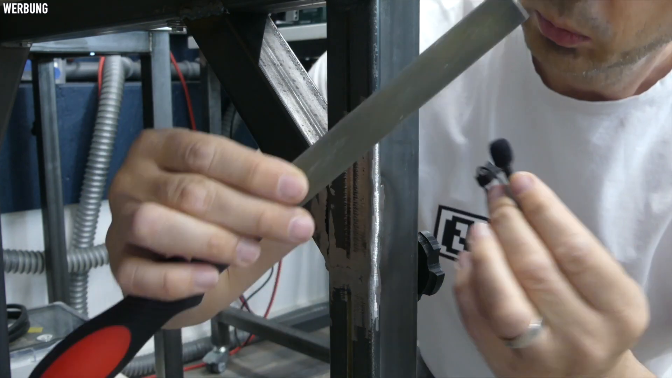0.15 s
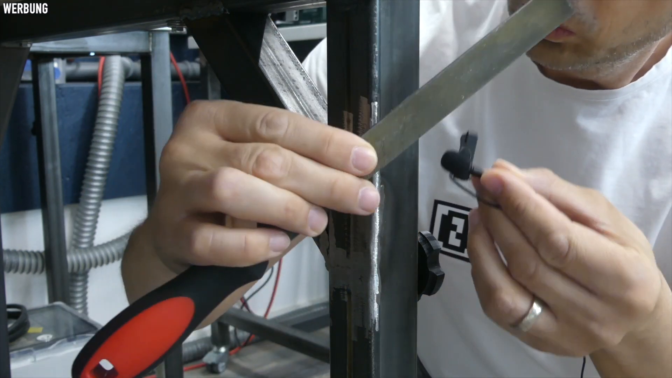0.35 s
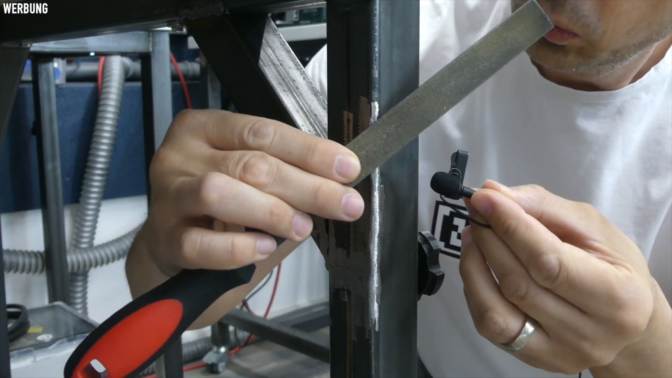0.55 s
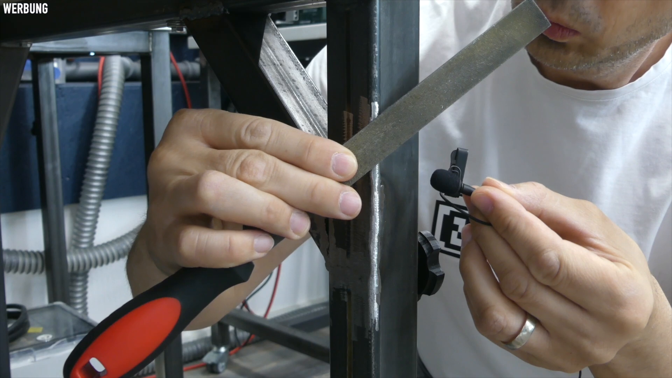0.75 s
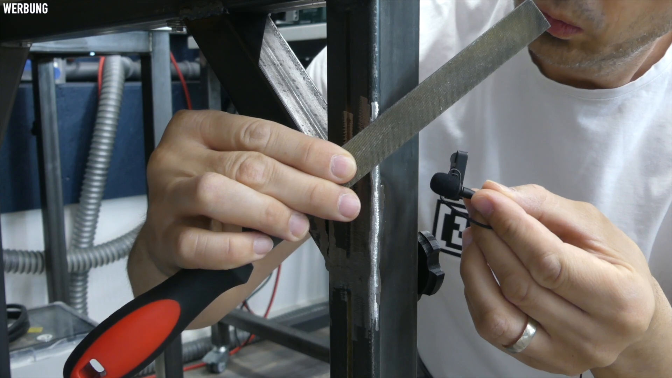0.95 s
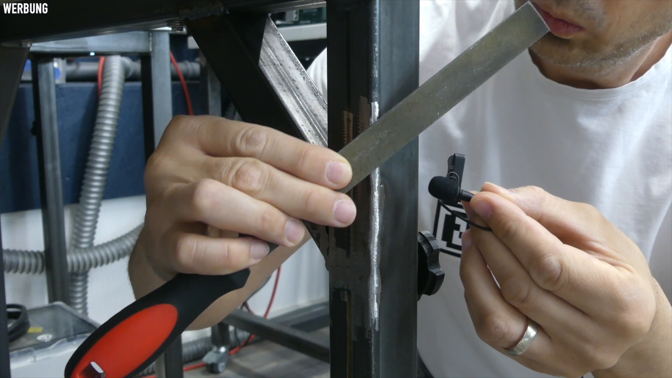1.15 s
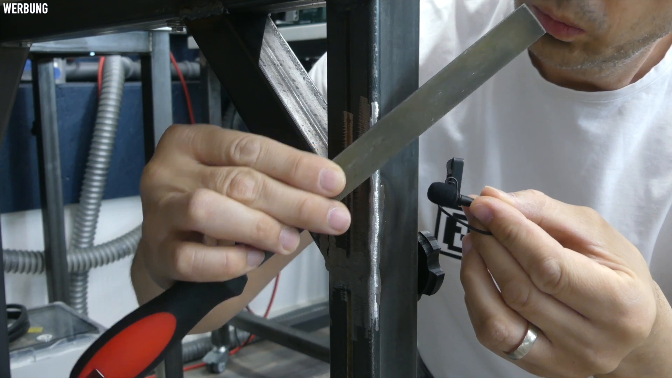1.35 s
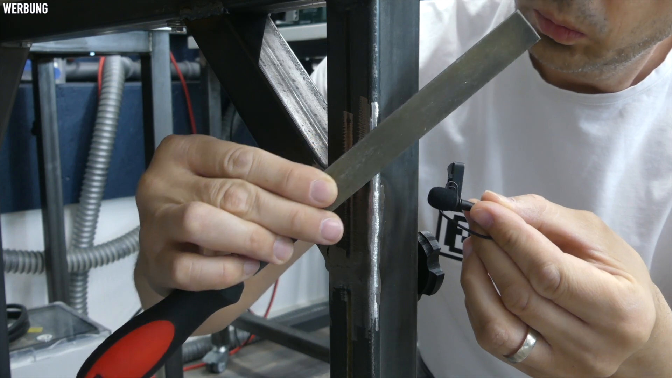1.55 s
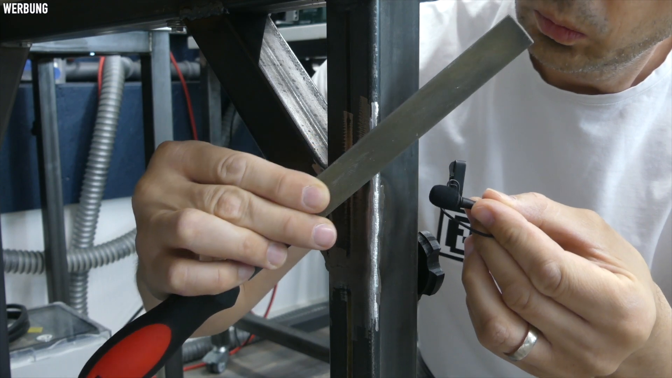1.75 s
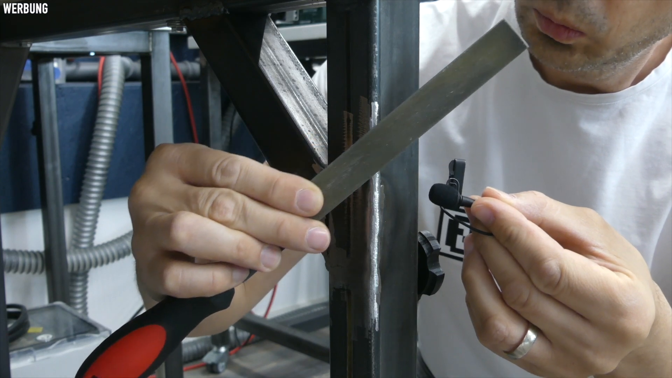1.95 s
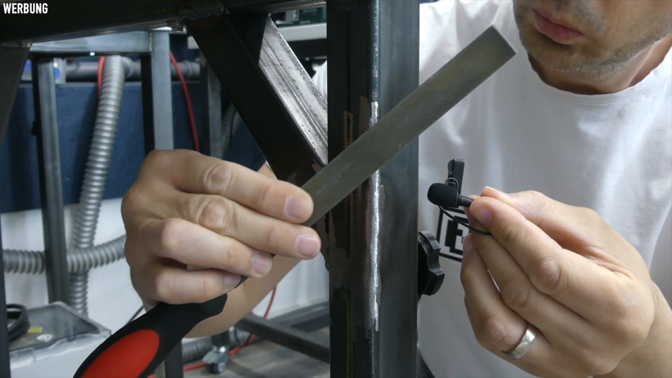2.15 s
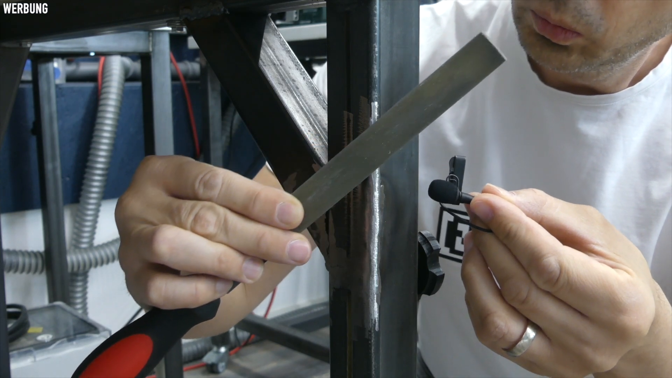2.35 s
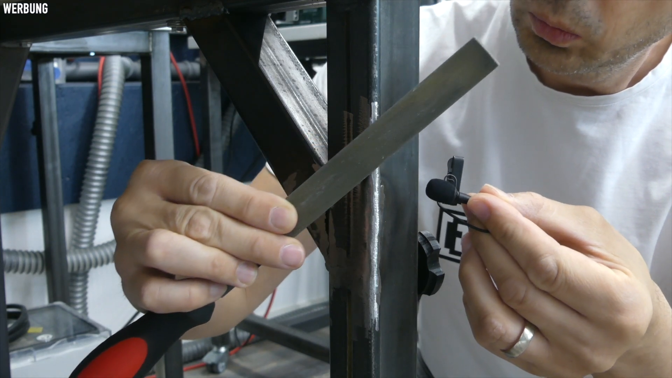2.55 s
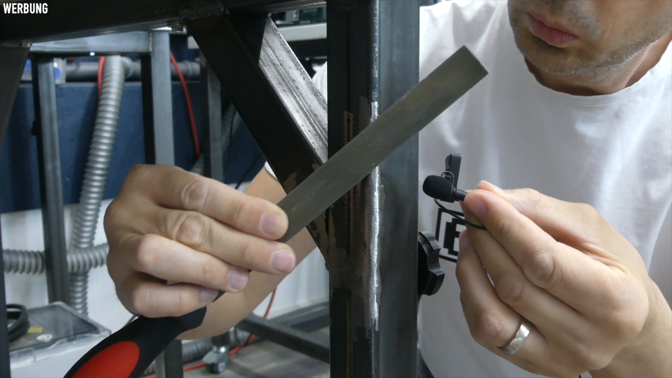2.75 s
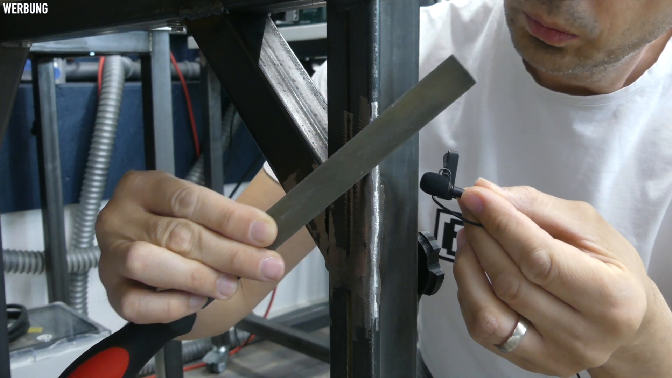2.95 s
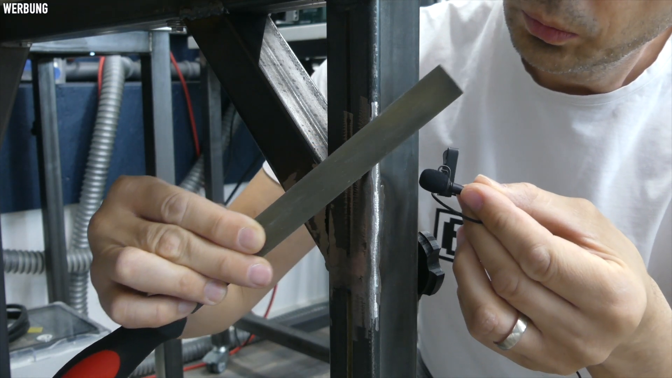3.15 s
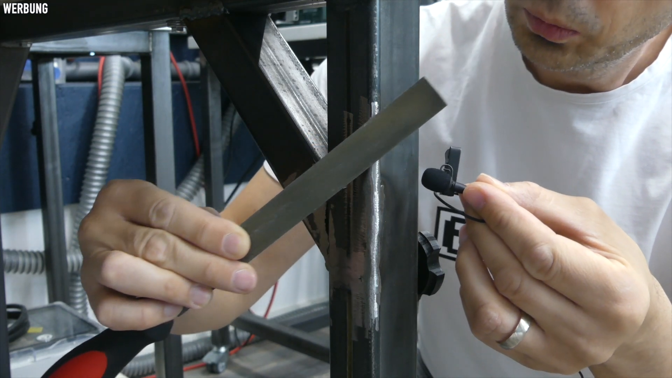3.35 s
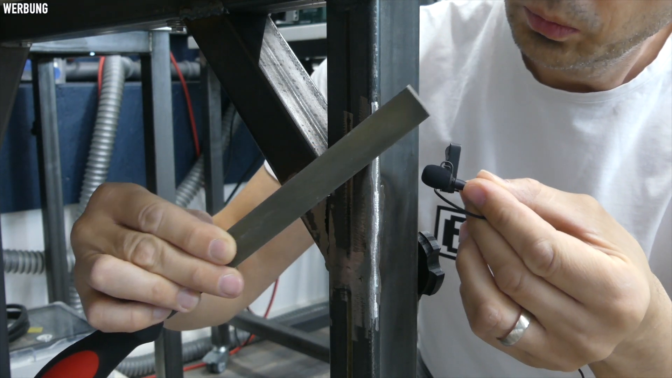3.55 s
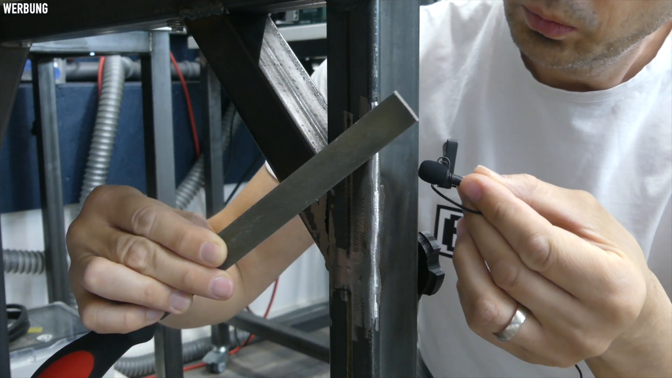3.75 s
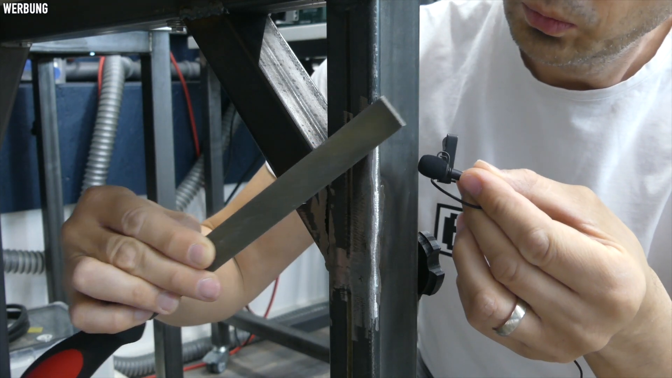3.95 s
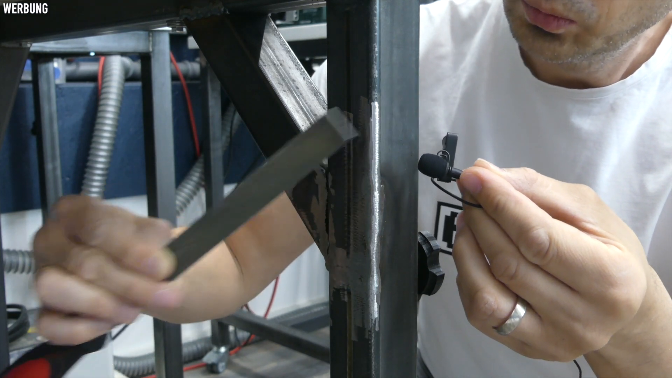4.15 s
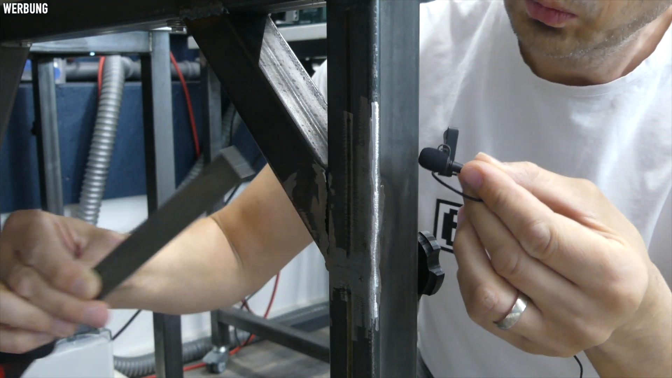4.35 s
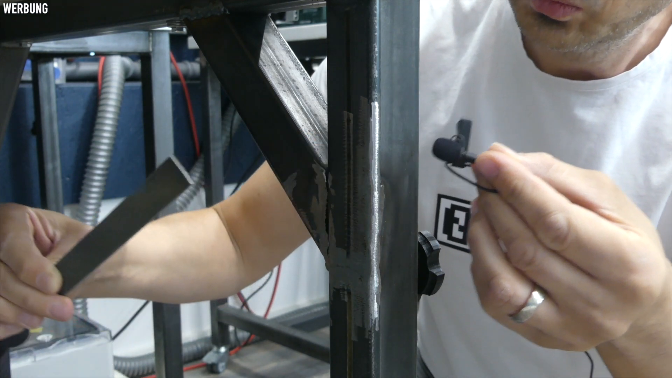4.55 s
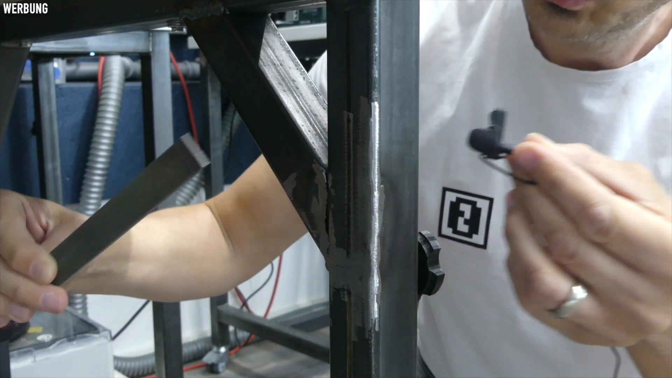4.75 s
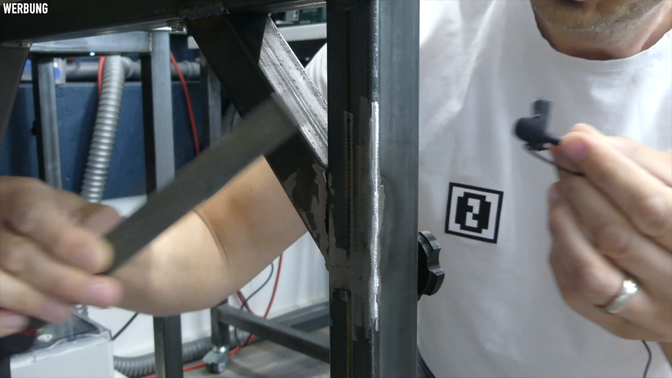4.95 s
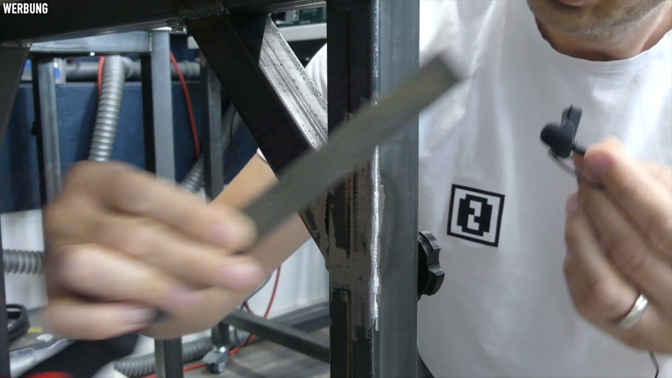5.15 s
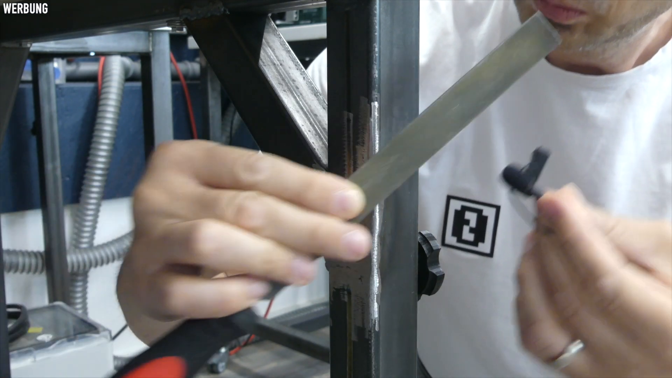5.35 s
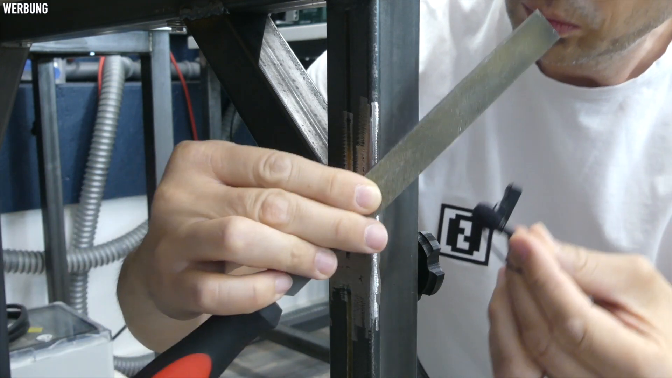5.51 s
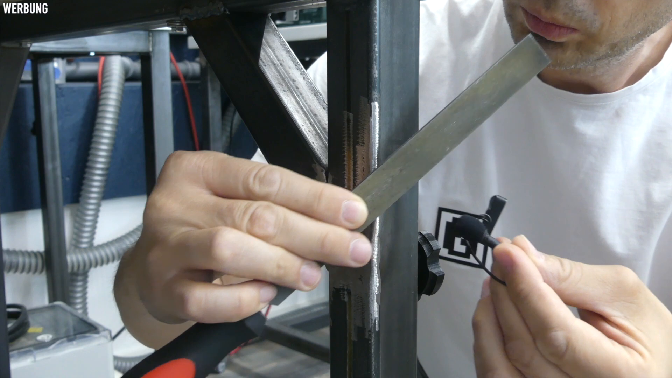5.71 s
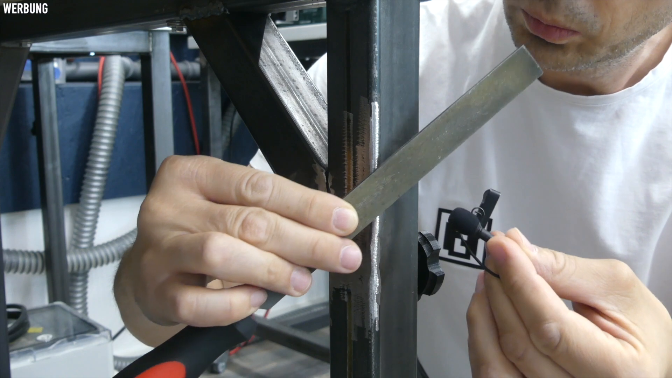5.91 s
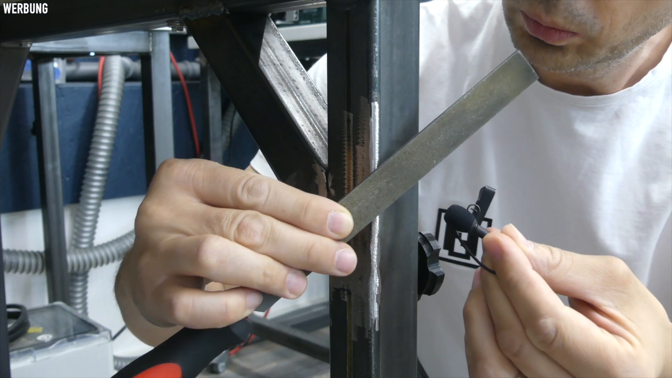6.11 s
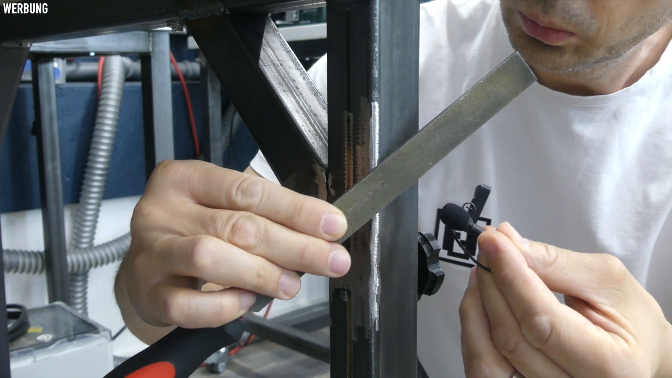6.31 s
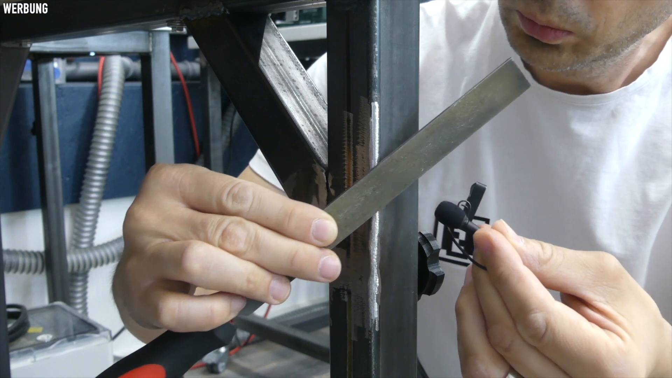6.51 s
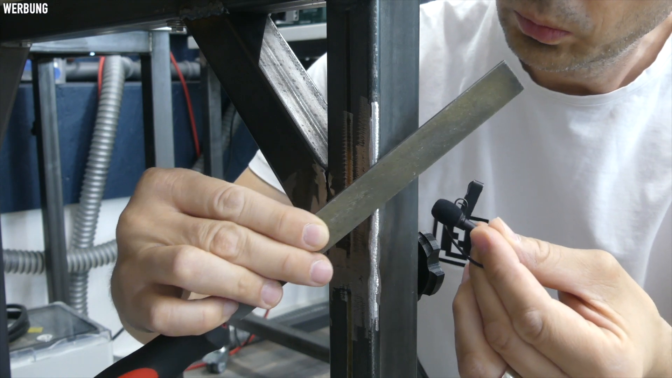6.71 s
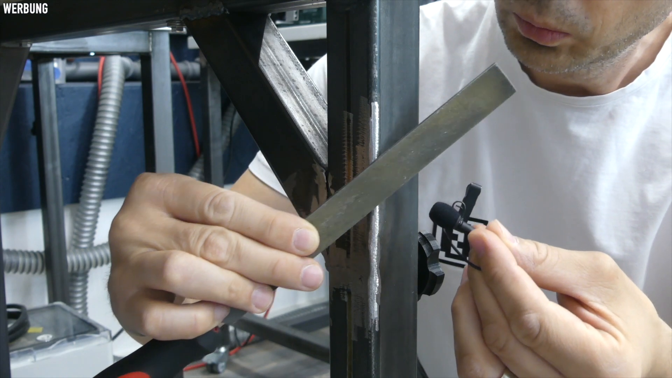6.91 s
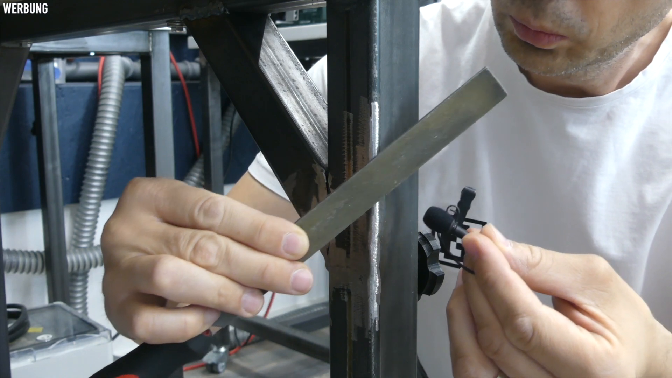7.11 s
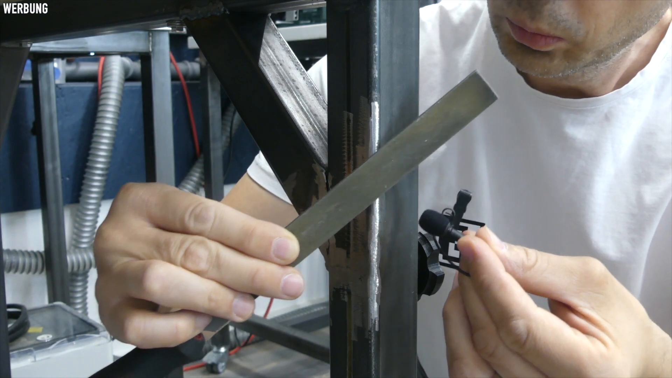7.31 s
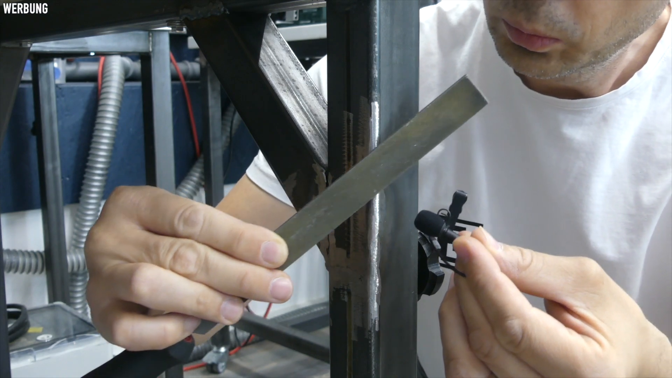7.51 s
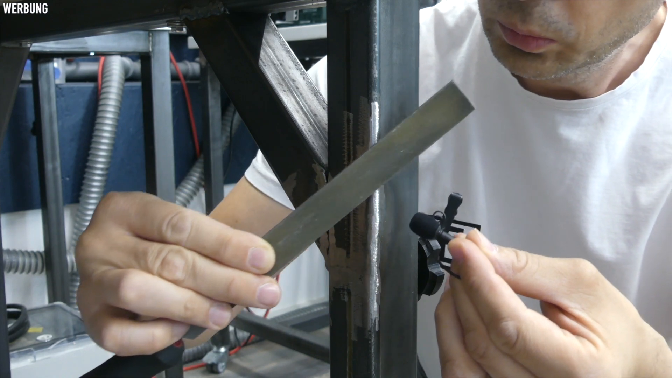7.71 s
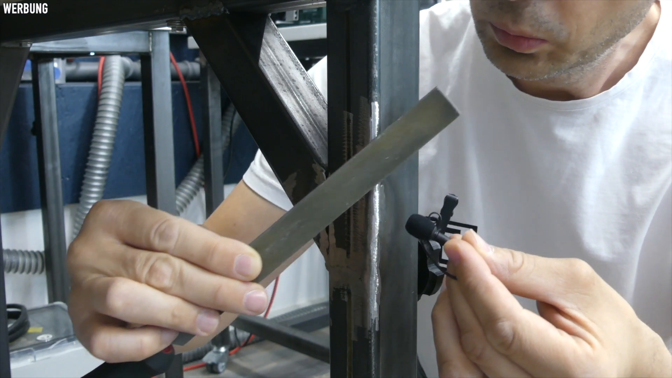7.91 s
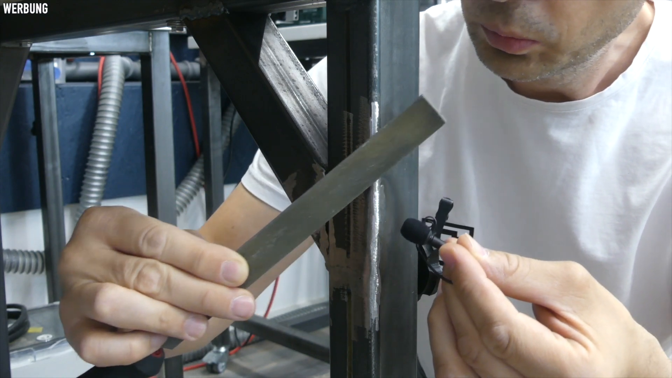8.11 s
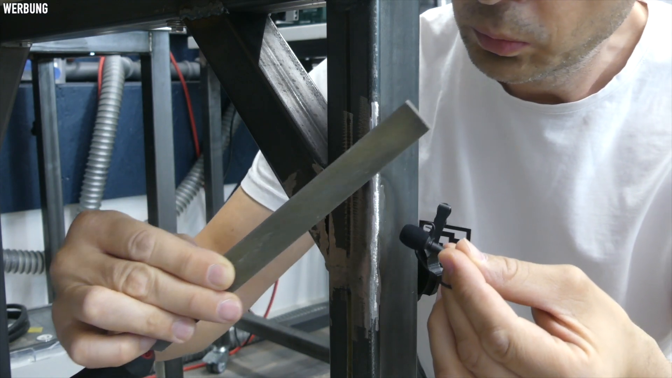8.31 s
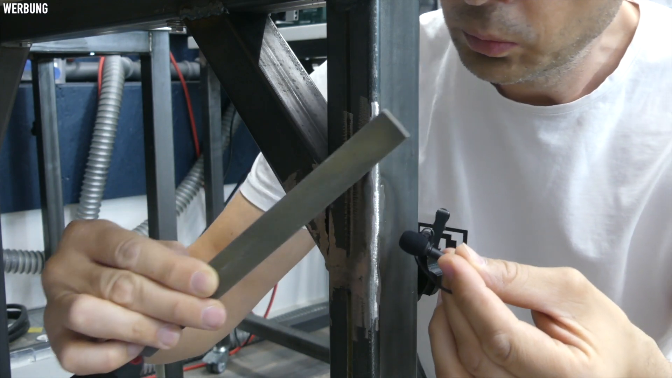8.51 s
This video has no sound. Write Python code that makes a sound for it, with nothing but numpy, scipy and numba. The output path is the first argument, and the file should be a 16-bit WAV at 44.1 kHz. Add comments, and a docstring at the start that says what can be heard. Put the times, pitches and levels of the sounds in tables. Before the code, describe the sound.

Two slow, rasping strokes of a hand file over ringing steel tube, heard very close, with ticks, cracks, a knock and brief squeals.

```python
"""A flat hand file is drawn slowly, twice, from handle to tip over the corner of a welded steel tube frame.
Its teeth catch and snap free; the tube rings at fixed pitches while the blade's own resonance climbs
towards the tip. Splinters tick, snags crack, the blade knocks the tube and short squeals sing out.
A clip-on microphone a few centimetres away also picks up fingers on it and its lead, and behind them
a quiet workshop: filtered noise for air and hiss, over a faint tone near 26 Hz.
"""
import sys
import numpy as np
from scipy import signal
from scipy.fft import rfft, irfft, next_fast_len
from scipy.io import wavfile
from scipy.ndimage import uniform_filter1d
from numba import njit

SR = 44100
rng = np.random.default_rng(int(sys.argv[2]) if len(sys.argv) > 2 else 0)


def generate_wav(sig):
    """Save sig (samples, or channels by samples) to the path in sys.argv[1] as 16-bit PCM at SR."""
    pcm = np.round(np.clip(np.atleast_2d(sig).T, -1, 1) * 32767).astype(np.int16)
    wavfile.write(sys.argv[1], SR, pcm)


N = 382523  # samples in the scene


def undb(db):
    """Decibels to gain."""
    return 10 ** (np.asarray(db) / 20)


def curve(rows):
    """The columns of a table, joined by straight lines in time."""
    seconds, *columns = np.transpose(rows)
    return [np.interp(np.arange(N) / SR, seconds, column) for column in columns]


def unit(x):
    """Scale to rms 1."""
    return x / np.sqrt(np.mean(x ** 2))


def walk(rate):
    """Random levels, `rate` new ones a second, joined by straight lines; rms 1."""
    steps = np.arange(N) / SR * rate
    return unit(np.interp(steps, np.arange(4096), rng.standard_normal(4096)))


def colour(x, points):
    """Causal minimum-phase filter with the gain of (Hz, dB) points."""
    size = next_fast_len(len(x) + 4096) // 2 * 2
    hz, db = np.transpose(points)
    bins_hz = np.arange(size // 2 + 1) * SR / size
    log_gain = np.log(undb(np.interp(np.log(bins_hz + 1), np.log(hz), db)))
    # folding the cepstrum forward in time makes the filter causal
    cepstrum = irfft(log_gain)[:size // 2]
    cepstrum[1:] *= 2
    return irfft(rfft(x, size) * np.exp(rfft(cepstrum, size)))[:len(x)]


def band(x, lo_hz, hi_hz):
    """Band-pass run twice, so that neighbouring bands add up flat."""
    sos = signal.butter(2, [lo_hz, min(hi_hz, .48 * SR)], "band", fs=SR, output="sos")
    return signal.sosfilt(sos, signal.sosfilt(sos, x))


@njit
def moving_bandpass(x, hz, width_hz):
    """State-variable band-pass, gain 1 at a centre that may move."""
    y, band_state, low_state = np.empty(len(x)), 0., 0.
    for i in range(len(x)):
        g, k = np.tan(np.pi * hz[i] / SR), width_hz[i] / hz[i]
        v = (band_state + g * (x[i] + 1e-18 - low_state)) / (1 + g * (g + k))
        band_state = 2 * v - band_state
        low_state = low_state + 2 * g * v
        y[i] = k * v
    return y


def resonate(x, hz, width_hz):
    """One resonance, fixed or moving."""
    return moving_bandpass(x, hz * np.ones(len(x)), width_hz * np.ones(len(x)))


def ring(force, response):
    """What a body with this response makes of a force."""
    return signal.oaconvolve(force, response)[:N]


def add(out, start_s, x):
    """Mix x into out from start_s."""
    i = max(int(start_s * SR), 0)
    out[i:i + len(x)] += x[:N - i]


# How the close microphone hears the frame, one register at a time. Each row: lowest Hz, highest Hz,
# level in dB at the usual effort, dB per dB of effort, dB from handle (0) to tip (1), dB while skating,
# dB as the tip runs out, judder in dB of drive.
FRAME_REGISTERS = [(46.5, 206.5, -47, 0.5, -21.5, -3, 3, 1.8), (250.7, 942, -47, 1., 1, 1, -5.5, -0.9),
                   (1100, 4650, -50.5, 1, -4.5, -2, 8, 2), (5100, 14800, -60, 0.68, -11.5, 1.5, 8.5, 2)]
TEETH_PER_S, TEETH_GAIN_PER_S = 140, 115  # nominal rate at the handle, and how many more at the tip


def filing(frame):
    """The teeth drive the frame; each register follows effort and contact point in its own measure."""
    effort_db = effort_above_usual()
    touching, place, skating, run_out = travel()
    force = blade(teeth(TEETH_PER_S + TEETH_GAIN_PER_S * place), place)
    judder = walk(150)  # the file grabs and eases

    def register(lo_hz, hi_hz, db, shake_db):
        """One register rings; the hand's steady pressure evens out slow runs of big and small teeth."""
        response = band(frame, lo_hz, hi_hz)
        drive = force * undb(shake_db * judder)
        power = ring(drive, response) ** 2
        smooth_power = uniform_filter1d(uniform_filter1d(power, size=2400), size=1200, origin=-400)
        slow_level = np.sqrt(smooth_power)
        return ring(drive * touching * undb(db) / slow_level, response)

    out = np.zeros(N)
    for lo_hz, hi_hz, db, follow, along_db, skate_db, tip_db, shake_db in FRAME_REGISTERS:
        level_db = db + follow * effort_db
        level_db = level_db + along_db * place + skate_db * skating + tip_db * run_out
        out = out + register(lo_hz, hi_hz, level_db, shake_db)
    return out


# How hard the hand bears on the file, one list per pass.
# Each row: time in seconds, effort in dB.
HAND_EFFORT = [
    [(0.86, -58), (0.87, -61), (0.93, -66), (0.99, -52), (1.16, -57), (1.21, -69), (1.25, -43), (1.42, -41),
     (1.57, -51.5), (1.71, -41), (1.89, -56.5), (1.92, -45), (2.19, -40.5), (2.46, -56.5), (2.58, -38.5),
     (2.7, -47.5), (2.75, -43), (3.15, -32), (3.22, -34), (3.25, -36.5), (3.45, -34), (3.74, -46),
     (3.79, -51), (3.93, -37), (4.04, -38), (4.1, -51)],
    [(6.22, -58), (6.27, -50), (6.29, -51.5), (6.4, -45.5), (6.52, -53), (6.68, -39), (6.72, -46),
     (6.84, -38.5), (6.87, -46), (7.1, -41), (7.29, -47), (7.45, -39), (7.5, -48), (7.54, -40), (7.79, -38),
     (7.86, -41), (8.07, -36.5), (8.1, -42), (8.28, -35), (8.29, -31), (8.31, -40), (8.38, -31.5),
     (8.4, -33), (8.53, -31.5), (8.63, -34), (8.67, -38.5)],
]
USUAL_EFFORT_DB = -44.5


def effort_above_usual():
    """The hand's effort through both passes, in dB above its usual effort."""
    return curve(np.vstack(HAND_EFFORT))[0] - USUAL_EFFORT_DB


def teeth(rate, uneven=.45, snap_spread_db=3.0, chip_s=0.0035, chips_db=7, rub_db=3):
    """Teeth snap free one after another, unevenly; each tears a chip that crackles for an instant."""
    passed = np.cumsum(rate * np.exp(uneven * walk(260))) / SR
    size = np.clip(rng.standard_normal(N), -2, 1.3)
    snaps = np.diff(np.floor(passed), prepend=0) * undb(snap_spread_db * size)
    tearing = signal.lfilter([1], [1, -np.exp(-1 / (chip_s * SR))], snaps)
    chips = tearing * rng.standard_normal(N)
    rub = rng.standard_normal(N)
    return unit(unit(snaps) + undb(chips_db) * unit(chips) + undb(rub_db) * rub)


# The two strokes across the corner. Each row: start in seconds, end in seconds, contact point the stroke
# heads for (0 handle, 1 tip), moment of fastest travel in seconds, time to gather way in seconds.
FILE_PASSES = [(0.86, 4.1, .76, 2.95, .3), (6.22, 8.67, .82, 7.9, .36)]
START_PLACE = .1  # contact point the stroke leaves from
BITE_S = 0.57  # at the start of a pass the teeth skate before they dig in
RUN_OUT_S = 0.33  # the thin tip scrapes by at the end of a pass


def travel():
    """Each pass gathers way and eases off: touching or not, contact point, skating, tip run out."""
    t = np.arange(N) / SR
    touching, place, skating, run_out = np.zeros((4, N))
    for start, end, reach, fastest, gather_s in FILE_PASSES:
        progress = 1 / (1 + np.exp((fastest - t) / gather_s))
        begun = t >= start - .1  # the file is in position just before it touches
        place = np.where(begun, START_PLACE + (reach - START_PLACE) * progress, place)
        skating = np.where(begun, np.exp(-((t - start) / BITE_S) ** 2), skating)
        run_out = np.where(begun, np.clip(1 + (t - end) / RUN_OUT_S, 0, 1), run_out)
        touching = touching + (t > start) * (t <= end)
    return uniform_filter1d(touching, size=400), place, skating, np.sin(np.pi / 2 * run_out) ** 2


# Resonances that colour the filing, blade overtones and two broad bands at tube pitches (766 and 1398 Hz),
# stronger or weaker by contact point and pass. Each row: pitch in Hz, width in Hz, best contact point
# (0 handle, 1 tip), reach around it on the same scale, lift in the first pass in dB, lift in the second
# pass in dB; both lifts are before flutter.
FILING_RESONANCES = [(766, 145, 0.67, .9, -19, -4.5), (1398, 220, 0.092, 0.17, -3.5, -7),
                     (2200, 880, 0.39, 0.14, 2, -21), (2800, 270, 0.084, 0.031, 4, 6),
                     (3463, 120, 0.61, 0.5, 6.5, -5), (3914, 144, 0.076, 0.84, -5, 4),
                     (4560, 640, 0.61, 0.18, 3.5, -15), (7400, 800, .1, 0.016, 3, 8),
                     (9000, 780, 0.33, 0.13, -3, 11), (9350, 800, 0.57, 0.11, 9, -17),
                     (11500, 360, .11, .035, 7, 13), (14700, 900, 0.15, .04, -10, 11)]
FLUTTER_DB, FLUTTER_PER_S = 3, 45  # the file rocks on the edge, so these resonances sing unevenly


def blade(force, place, handle_hz=205, tip_hz=700, breadth=0.45, lift_db=7, yield_share=0.32,
          yield_ratio=0.21):
    """The bending resonance climbs towards the tip; fixed resonances swell around their contact points."""
    bend_hz = handle_hz * (tip_hz / handle_hz) ** place
    out = force + undb(lift_db) * resonate(force, bend_hz, breadth * bend_hz)
    # well below that resonance the blade gives way and passes less force on
    yield_hz = yield_ratio * bend_hz
    out = out - np.clip(yield_share * 2 * place, 0, .8) * resonate(out, yield_hz, yield_hz)
    between_passes_s = (FILE_PASSES[0][1] + FILE_PASSES[1][0]) / 2
    second = np.arange(N) / SR > between_passes_s
    for hz, width_hz, best, reach, first_db, second_db in FILING_RESONANCES:
        share = np.exp(-((place - best) / reach) ** 2)
        flutter_db = FLUTTER_DB * walk(FLUTTER_PER_S)
        db = np.where(second, second_db, first_db) + flutter_db
        out = out + undb(db) * share * resonate(force, hz, width_hz)
    return out


# The tube frame's strong modes.
# Each row: pitch in Hz, relative energy in dB, time to fall 60 dB in seconds.
TUBE_MODES = [(148.1, -4.5, 0.18), (242.6, 1, 0.32), (260, -10.5, 0.71), (331, -4.5, 0.13),
              (353, -9.5, 0.22), (402.4, -1.5, 0.41), (555, -16, 0.13), (591.3, -11, 0.057),
              (752.4, -0.5, 0.54), (777, 1, 0.28), (1053, -20, 0.27), (1116, -9.5, 0.17),
              (1298, -0.5, 0.076), (1318.5, 1.5, 0.45), (1394, -3.5, 0.54), (1535, -13.5, 0.35),
              (1767, -3.5, 0.12), (1918, -7.5, 0.23), (1955, -3, 0.36), (1930, -22, 0.95),
              (2188, -32, 0.96), (2220, -14, 0.25), (2780, -12.5, 0.05), (3414, -8, 0.072), (3767, -4, 0.1),
              (3748, -13, 0.037), (4390, -14.5, 0.087), (5280, -19, 0.05)]
# The crowd of weaker modes between them. Each row: frequency in Hz, relative level in dB per Hz.
STEEL_CROWD = [(40, -11), (90, -8), (170, -8), (330, -8), (600, -2), (1000, 0), (2000, -6), (3000, -7.5),
               (4200, -11.5), (5200, -12.5), (7000, -12), (9500, -17.5), (10600, -21), (15500, -20.5)]


def frame_response(rings_db=0, clusters_db=-3, cluster_breadth=0.016, crowd_db=-7, direct_db=-6,
                   crowd_t60=0.74, treble_t60=0.15):
    """The frame answers a tooth: a tick, strong modes, and a weak crowd whose treble dies first."""
    t = np.arange(int(.7 * SR)) / SR

    def fade(t60):
        """Decay by 60 dB in t60 seconds, with equal energy whatever its length."""
        return np.exp(-np.log(1000) * t / t60) / np.sqrt(t60)

    # the welded tubes surround each mode with close neighbours, which soon drift out of step
    rings, clusters = np.zeros((2, len(t)))
    for hz, db, t60 in TUBE_MODES:
        tone = undb(db) * np.cos(2 * np.pi * hz * t)
        rings += tone * fade(t60)
        clusters += tone * fade(2 / (cluster_breadth * hz))
    modes = undb(rings_db) * unit(rings) + undb(clusters_db) * unit(clusters)
    # the contact is not perfectly sharp
    modes = signal.sosfilt(signal.butter(2, 6000, fs=SR, output="sos"), modes)
    noise = rng.standard_normal(len(t))
    body = band(noise, 51, 3900) * fade(crowd_t60)
    treble = band(noise, 3100, 27000) * fade(treble_t60)
    crowd = colour(body + treble, STEEL_CROWD)
    tick = colour(1. * (t == 0), STEEL_CROWD)
    whole = unit(modes) + undb(crowd_db) * unit(crowd) + undb(direct_db) * unit(tick)
    return unit(whole) / np.sqrt(len(t))


def splinters(frame, per_s=30, spread_db=4, top_db=12, db=-64, follow=0.59, above_hz=3000,
              below_hz=11500, crack_s=.0007):
    """Now and then a larger chip breaks off with a tiny bright tick."""
    size_db = np.minimum(spread_db * rng.exponential(size=N), top_db)
    breaks = (rng.random(N) < per_s / SR) * undb(size_db)
    cracks = signal.lfilter([1], [1, -np.exp(-1 / (crack_s * SR))], breaks) * rng.standard_normal(N)
    ticks = unit(ring(cracks, band(frame, above_hz, below_hz)))
    touching = travel()[0]
    return ticks * touching * undb(db + follow * effort_above_usual())


# The teeth fall into step with the tube and it sings out.
# Each row: start in seconds, build-up in seconds, level in dB.
TUBE_SQUEALS = [(3.196, 0.043, -45), (8.014, 0.046, -35), (8.274, .035, -33.5), (8.325, 0.058, -29.5)]


def squeals(hz=768, waver_hz=10, release_s=0.014):
    """A wavering ring of the tube builds up while the teeth keep step, then the file damps it."""
    t = np.arange(N) / SR
    swell = np.zeros(N)
    for start, length, db in TUBE_SQUEALS:
        build_up = np.clip((t - start) / length, 0, 1)
        release = np.exp(-np.maximum(t - start - length, 0) / release_s)
        swell += undb(db) * build_up * release
    return swell * unit(np.sin(2 * np.pi * np.cumsum(hz + waver_hz * walk(100)) / SR))


# A tooth snags on the edge. Each row: start in seconds, level in dB before the common gain,
# lower edge of its band in Hz.
TOOTH_SNAGS = [(0.867, -46.5, 2200), (0.984, -42, 2000), (1.031, -37, 6400), (1.092, -40, 4500),
               (1.137, -47, 5000), (1.2426, -41, 1500), (2.546, -26, 1100), (2.8037, -25.5, 1290),
               (3.424, -35, 5970), (3.4304, -20.5, 1510), (4.0132, -25, 1710), (6.1263, -41.5, 3600),
               (6.2666, -34, 5450), (6.551, -38, 1700), (6.6686, -34, 2350), (6.79, -31, 2980),
               (6.8294, -31.5, 2600), (7.117, -30, 2000), (7.381, -36, 9000), (7.4036, -31, 1700),
               (8.0381, -27.5, 1490), (8.175, -28, 1500), (8.4881, -21, 1870)]


def snags(frame, gain_db=12, rise_s=.001, crack_s=0.0024, span=3.5):
    """A snagged tooth cracks loose: a thin scratch when it skates, a fuller one when it bites."""
    out, t = np.zeros(N), np.arange(800) / SR
    for start, db, above_hz in TOOTH_SNAGS:
        crack = rng.standard_normal(len(t)) * (1 - np.exp(-t / rise_s)) * np.exp(-t / crack_s)
        edges_hz = [min(above_hz, .3 * SR), min(span * above_hz, .45 * SR)]
        sos = signal.butter(2, edges_hz, "band", fs=SR, output="sos")
        sound = signal.fftconvolve(crack, signal.sosfilt(sos, frame))
        add(out, start, undb(db + gain_db) * sound / np.linalg.norm(sound))
    return out


# The blade knocks against the tube. Each row: start in seconds, level in dB before the common gain,
# frequency in Hz above which the contact is dull.
BLADE_KNOCKS = [(0.676, -38.5, 352), (0.866, -46, 1450), (0.985, -40.5, 1490), (2.564, -29, 300),
                (3.21, -30.5, 900), (3.431, -27, 1400), (4.058, -24, 252), (6.127, -34, 506),
                (6.661, -9, 55)]


def knocks(frame, gain_db=17, chatter_s=0.018, chatter_db=-3):
    """The blade bumps the tube and chatters briefly; a softer contact favours the low modes."""
    force, t = np.zeros(N), np.arange(2000) / SR
    for start, db, dull_hz in BLADE_KNOCKS:
        chatter = rng.standard_normal(len(t)) * np.exp(-t / chatter_s)
        bump = (t == 0) + undb(chatter_db) * chatter / np.linalg.norm(chatter)
        softened = signal.sosfilt(signal.butter(2, dull_hz, fs=SR, output="sos"), bump)
        add(force, start, undb(db + gain_db) * softened)
    return ring(force, frame)


# Fingers shift on the microphone and its lead. Each row: start in seconds, level in dB, length in seconds,
# centre in Hz, width in Hz (each of two filters is twice as wide).
MICROPHONE_RUBS = [(0.005, -70, 0.055, 293, 260), (0.177, -59.5, 0.003, 400, 626),
                   (0.215, -63, 0.029, 218, 200), (0.216, -76, 0.045, 1400, 700),
                   (0.283, -76, 0.028, 240, 100), (0.318, -66, 0.027, 240, 70),
                   (4.958, -75, .04, 1700, 1500)]


def handling():
    """Fingers rub the microphone and its lead: short swells of noise through two resonances."""
    out, t = np.zeros(N), np.arange(8192) / SR
    for start, db, length, hz, width_hz in MICROPHONE_RUBS:
        rub = rng.standard_normal(len(t)) * np.sin(np.pi * np.minimum(t / length, 1)) ** .5
        rub = resonate(resonate(rub, hz, 2 * width_hz), hz, 2 * width_hz)
        # t[-1] is the whole stretch: the level belongs to the rub's own length
        add(out, start, undb(db) * unit(rub) * np.sqrt(length / t[-1]))
    return out


# Workshop air and microphone hiss. Each row: frequency in Hz, relative level in dB per Hz.
ROOM_AIR = [(11, -33), (18, -21), (36, -9.5), (90, -17.5), (304, -23), (371, -23.5), (521, -26.5),
            (752, -28.5), (1090, -31.5), (15500, -34)]
# The part that differs between left and right. Each row: frequency in Hz, relative level in dB per Hz.
ROOM_SIDE = [(30, -1), (200, -5), (1000, -20.5), (15500, -19.5)]
# The air and hiss are softer at first. Each row: time in seconds, gain in dB.
ROOM_RISE = [(0.46, -8.5), (0.48, -4)]
# A faint very low tone swells and sinks. Each row: middle in seconds, half length in seconds, level in dB.
LOW_TONE_SWELLS = [(1.35, 0.22, -64), (2.202, 0.26, -63), (4.4, 0.33, -74), (6.102, 0.41, -73),
                   (7.1, .25, -68)]
AIR_DB, SIDE_DB = -63.5, -76.5  # before the gain of ROOM_RISE
LOW_TONE_DB = -74  # between the swells


def background(tone_hz=26):
    """Still air and hiss, a little of it different left and right, plus a very low unsteady sine."""
    t = np.arange(N) / SR
    air = undb(AIR_DB) * unit(colour(rng.standard_normal(N), ROOM_AIR))
    side = undb(SIDE_DB) * unit(colour(rng.standard_normal(N), ROOM_SIDE))
    swell = undb(LOW_TONE_DB) * np.ones(N)
    for middle, half, db in LOW_TONE_SWELLS:
        swell += undb(db) * np.exp(-((t - middle) / half) ** 2)
    low_tone = swell * unit(np.sin(2 * np.pi * np.cumsum(tone_hz + 2 * walk(18)) / SR))
    left_right = air + side * np.array([[1], [-1]])
    return left_right * undb(curve(ROOM_RISE)[0]) + low_tone


def scene():
    """The close microphone hears the file on the frame, the fingers and the room."""
    frame = frame_response()
    file_work = filing(frame) + splinters(frame) + squeals()
    accidents = snags(frame) + knocks(frame)
    return file_work + accidents + handling() + background()


TOP_HZ = 15720  # the recorder cuts above this


def record(dry):
    """The recorder has a narrow notch in the treble and cuts the top steeply."""
    notched = signal.lfilter(*signal.iirnotch(5945, 55, fs=SR), dry)
    return signal.sosfilt(signal.ellip(10, .2, 70, TOP_HZ, fs=SR, output="sos"), notched)


dry = scene()
out = record(dry)
generate_wav(out)
```